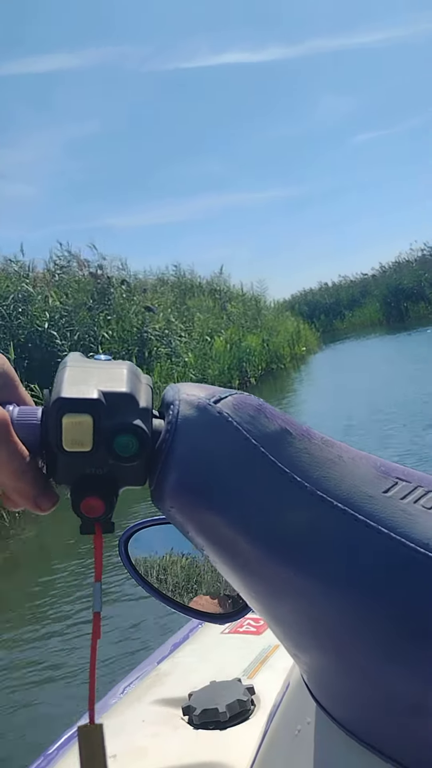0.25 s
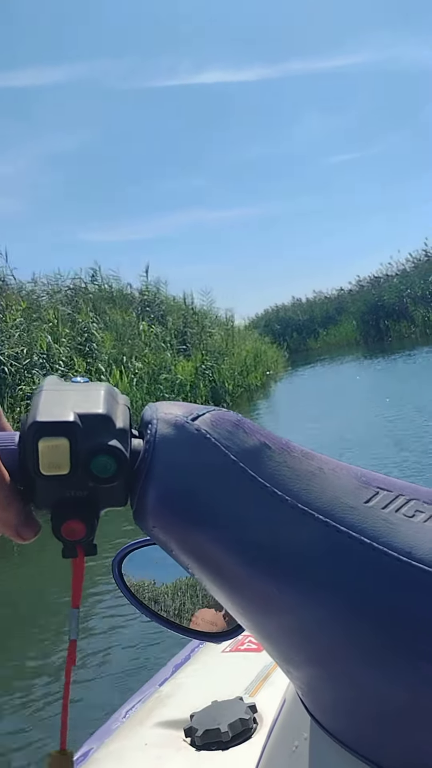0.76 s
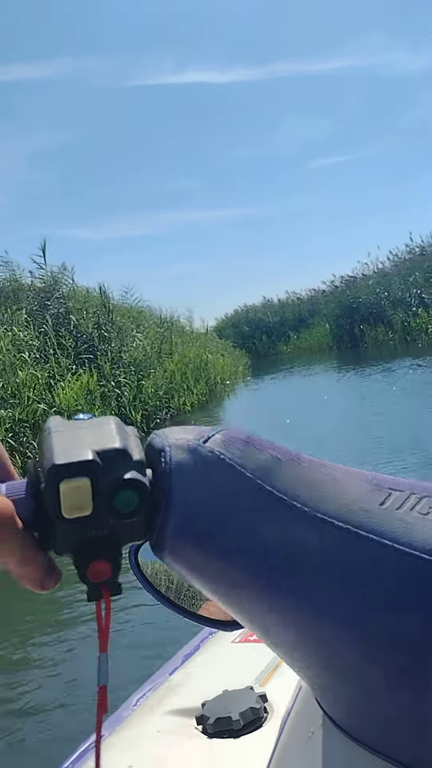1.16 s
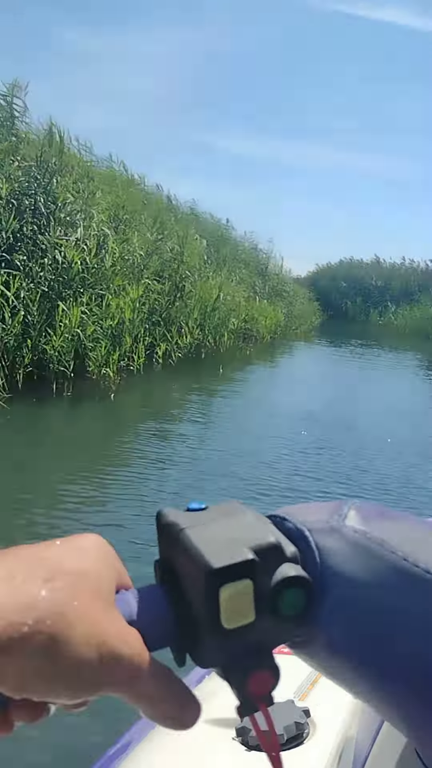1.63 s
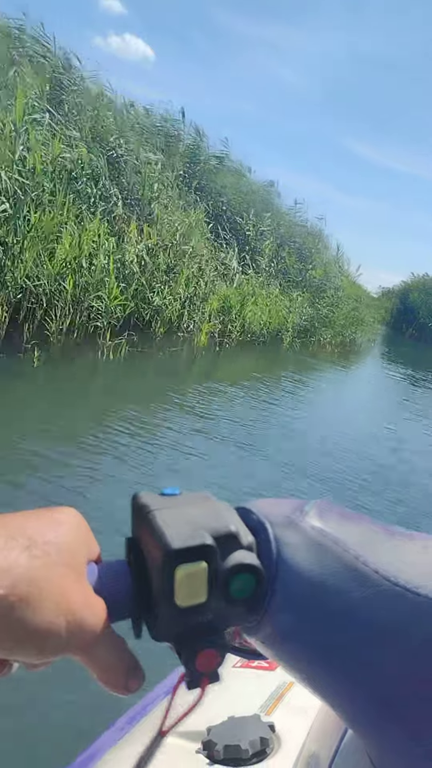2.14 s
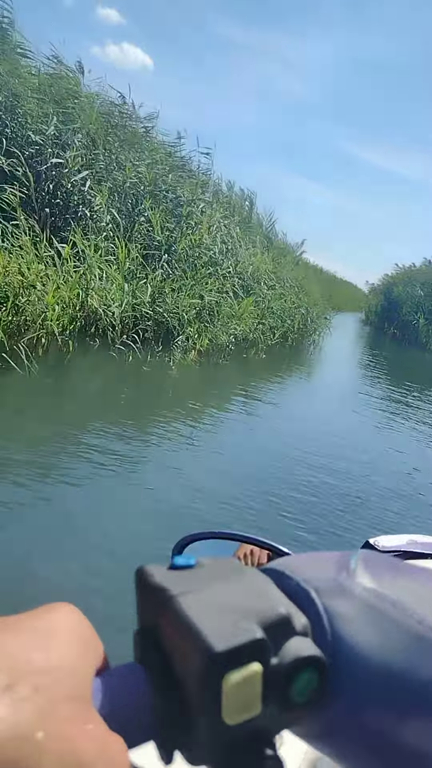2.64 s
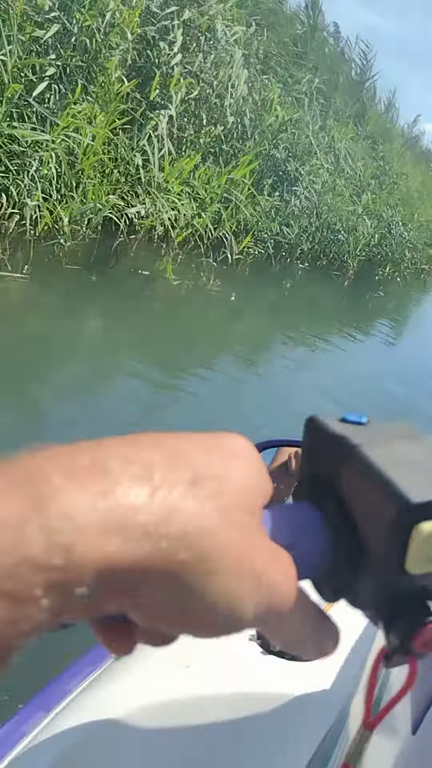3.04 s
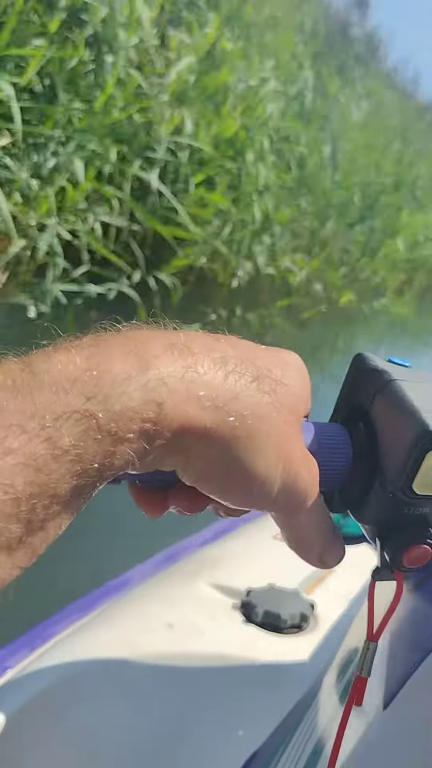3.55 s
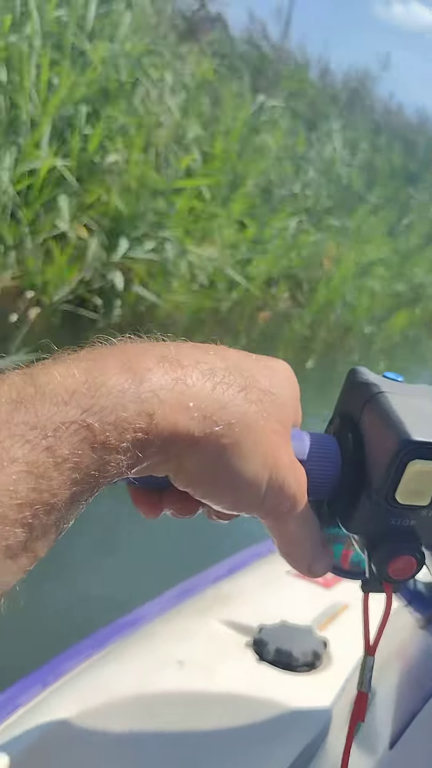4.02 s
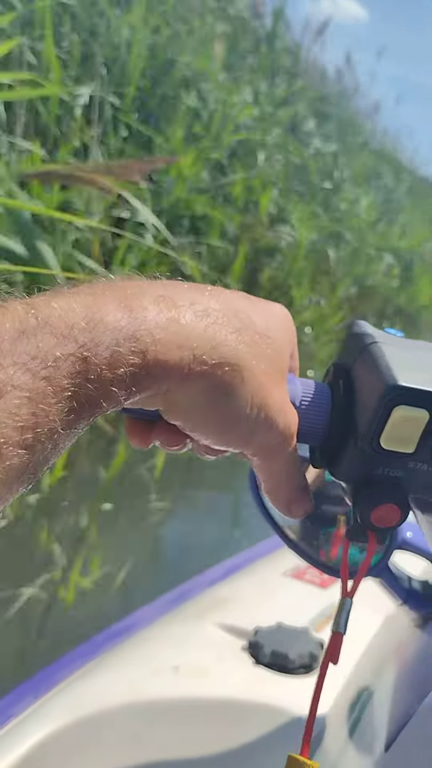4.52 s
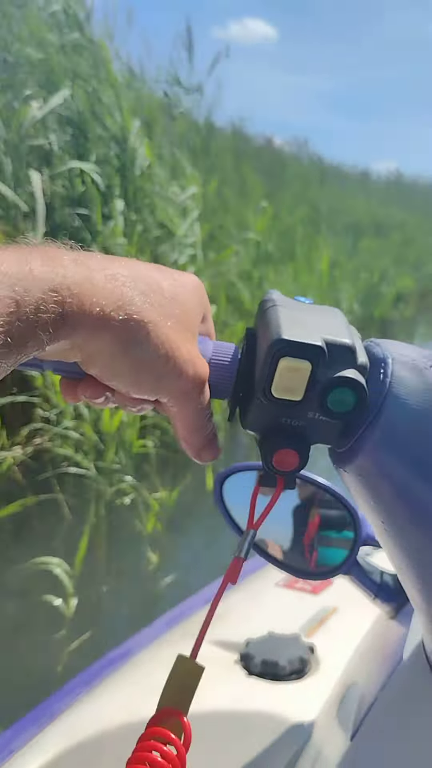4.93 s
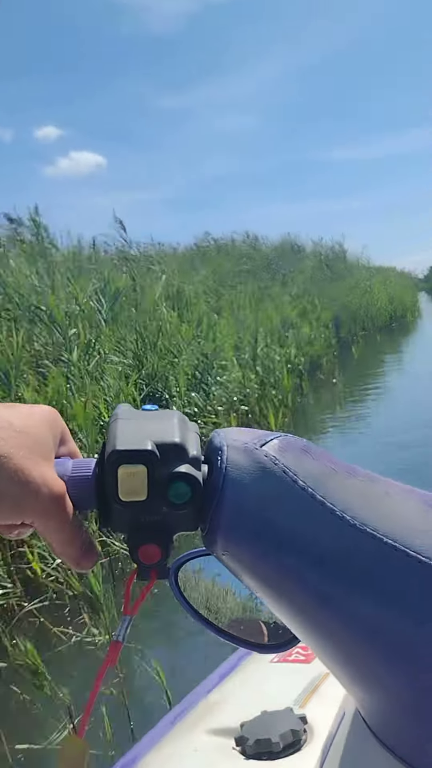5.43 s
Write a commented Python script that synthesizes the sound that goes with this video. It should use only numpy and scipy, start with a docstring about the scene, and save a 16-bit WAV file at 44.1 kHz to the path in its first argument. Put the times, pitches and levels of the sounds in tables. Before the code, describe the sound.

Outdoors on a marsh channel, the microphone rides by the handlebar of a personal watercraft. Its motor putters low, then climbs to a buzzing whine and winds down, with brief hoots from the hull. Two more bursts of throttle follow, the last bringing a stronger drone. Exhaust bubbles in the water throughout, while splashing and sizzling spray build in the second half, joined late by light, sharp ticks.

```python
"""A small watercraft in a reed channel

Heard from the handlebar, a two-stroke engine revs up three times. Its orders (tones at multiples of
the crank's turning rate) slide through the resonances of the pipe and hull, and the motor buzzes and
rasps under its cover. Exhaust gas burbles and gulps at the waterline, and a hull panel hoots. As the
craft gathers way the wash hisses louder, spray patters and sizzles, and a loose fitting ticks."""
import sys
import numpy as np
from scipy import signal
from scipy.fft import rfft, irfft
from scipy.io import wavfile
from scipy.ndimage import uniform_filter1d, minimum_filter1d

SR = 44100
rng = np.random.default_rng(int(sys.argv[2]) if len(sys.argv) > 2 else 0)


def store_wav(level_fs):
    """Save 16-bit WAV to argv[1]."""
    pcm = np.round(np.clip(np.atleast_2d(level_fs), -1, 1) * 32767)
    wavfile.write(sys.argv[1], SR, pcm.T.astype(np.int16))


N = 250488
TIME = np.arange(N) / SR
BINS = np.maximum(np.fft.rfftfreq(N, 1 / SR), 1)  # the frequencies of a spectrum, in Hz
IDLE_TURNS_PER_S, CRUISE_TURNS_PER_S = 64, 90

# The tuned pipe favours different orders at different speeds:
# (order [multiple of the crank rate], level at low revs [dB], at middle revs [dB], at high revs [dB])
ORDERS = [(4, -40, -43.5, -56), (5, -44, -49.5, -43), (6, -45, -48.5, -42), (7, -44.5, -43.5, -56.5),
          (8, -52, -57, -38.5), (9, -56.5, -57.5, -47.5), (10, -45.5, -47.5, -40.5), (11, -48.5, -49, -44),
          (12, -57.5, -48, -49), (13, -52, -54, -52), (14, -51, -45.5, -57.5), (15, -71, -58, -60),
          (16, -50, -56, -46), (17, -52, -47.5, -50.5), (20, -63.5, -51, -49.5), (21, -58.5, -54.5, -53),
          (22, -79.5, -51, -50)]


def from_db(db):
    """Turn decibels into a factor to multiply by."""
    return 10 ** (np.asarray(db) / 20)


def rms(x):
    """The average strength of a signal (root mean square)."""
    return np.sqrt(np.mean(x ** 2) + 1e-20)


def in_time(rows):
    """Join (time, value) points with straight lines, giving a value at every sample."""
    return np.interp(TIME, *np.transpose(rows))


def at_hz(points, hz):
    """Read between (frequency, value) points, with octaves evenly spaced."""
    known_hz, values = np.transpose(points)
    return np.interp(np.log(hz), np.log(known_hz), values)


def step(x):
    """A soft switch from 0 to 1 around x = 0."""
    return .5 + .5 * np.tanh(x)


def bumps(rows):
    """Bell-shaped lifts in dB from rows of (time, lift, half length)."""
    return sum(db * np.exp(-np.minimum(((TIME - s) / half) ** 2, 20)) for s, db, half in rows)


def swells(rows):
    """Bell-shaped rises out of silence from rows of (time, level, half length)."""
    return sum(from_db(db) * np.exp(-((TIME - s) / half) ** 2) for s, db, half in rows)


def drift(rate):
    """A smooth random wander of typical size 1, changing about `rate` times a second."""
    stride, warm_up = 40, 2000  # samples per point, points thrown away
    memory = np.exp(-2 * np.pi * rate * stride / SR)
    jitter = rng.standard_normal(N // stride + warm_up + 2)
    slow = signal.lfilter([1], [1, -2 * memory, memory * memory], jitter)[warm_up:]
    return np.interp(np.arange(N) / stride, np.arange(len(slow)), slow / rms(slow))


def stereo(hz):
    """Left and right gains, as complex numbers: each pitch is louder and earlier on one side."""
    # Which side is louder: (frequency [Hz], left minus right [dB])
    balance = [(30, 3.02), (70, 1.48), (130, -2), (210, -4), (290, -8), (340, -12), (430, -8), (530, -2),
               (650, 3.8), (880, 0.8), (1150, -11), (2200, -17), (4200, -12)]
    # Which side is earlier: (frequency [Hz], lead of the left [radians])
    left_lead = [(100, -0.8), (250, -0.86), (325, -0.87), (400, 0.46), (520, 1.94), (800, 1.77),
                 (1000, 0.3), (1300, -1.72)]
    ratio, lead = from_db(at_hz(balance, hz)), at_hz(left_lead, hz)
    return np.array([ratio * np.exp(.5j * lead), np.exp(-.5j * lead)]) * np.sqrt(2 / (1 + ratio ** 2))


def noise(colour_db, band_hz):
    """Stereo noise with a given spectrum; the average of its sides has strength 1 within the band."""
    # Low sounds are nearly the same on both sides: (frequency [Hz], likeness [0-1])
    likeness = [(300, .98), (600, .85), (1200, .45), (2500, .25), (8000, .2)]
    alike = at_hz(likeness, BINS)
    mid, side = rfft(rng.standard_normal((2, N)))
    pair = np.sqrt(1 + alike) * mid + np.sqrt(1 - alike) * side * [[1], [-1]]
    pair = pair * stereo(BINS) * from_db(colour_db)
    inside = (BINS > band_hz[0]) & (BINS < band_hz[1])
    return irfft(pair, N) / rms(irfft(pair.mean(axis=0) * inside, N))


def engine_speed():
    """Crank turns per second: after each move of the throttle the speed glides toward a new goal."""
    # Moves of the throttle: (time [s], goal [turns/s], lag [s])
    throttle = [(0.0, 65.7, 0.082), (0.42, 67.5, 0.06), (0.537, 71.1, 0.272), (0.938, 91.4, 0.378),
                (1.065, 122.7, 0.355), (1.219, 106.9, 0.073), (1.702, 88.1, 0.216), (1.846, 80.2, 0.47),
                (1.962, 82.2, 0.099), (2.166, 61.9, 0.739), (2.624, 88.2, 0.087), (2.732, 107.9, 0.066),
                (3.418, 96.6, 0.219), (3.767, 96.4, 0.061), (4.51, 92.1, 0.097), (4.839, 110.3, 0.071)]
    speed = np.full(N, float(IDLE_TURNS_PER_S))
    for s, goal, lag_s in throttle:
        start = int(s * SR)
        speed[start:] = goal + (speed[start] - goal) * np.exp(-TIME[:N - start] / lag_s)
    return speed


def acceleration(speed):
    """How many turns per second the engine gains each second."""
    return uniform_filter1d(np.gradient(speed) * SR, size=4000)


def coasting(speed):
    """How fast the engine is running down, from 0 to 1."""
    return np.tanh(np.maximum(-acceleration(speed), 0) / 13)


def doublings(speed):
    """How many times the speed has doubled from cruise; negative when slower."""
    return np.log2(speed / CRUISE_TURNS_PER_S)


def order_tone(order, speed, crank, gain):
    """One engine tone, sliding with the speed; higher orders leave the pipe later in the turn."""
    # An order flares or sags as the pipe comes in and out of tune with it:
    # (order [multiple of the crank rate], time [s], lift [dB], half length [s])
    flares = [(7, 0.55, -14, 0.055), (5, 1.097, 5, 0.03), (5, 1.21, 13, 0.03), (4, 1.276, 4, .04),
              (12, 1.38, 5.5, .1), (11, 1.55, 8.5, .14), (4, 1.3, 9, 0.058), (20, 1.68, 7.5, .05),
              (4, 1.82, 1.5, 0.076), (6, 2.7, 7, .06), (13, 2.76, 17, 0.061), (11, 2.36, 6, .09),
              (4, 2.8, 8, 0.068), (5, 2.88, 3.5, .08), (20, 3.38, 6, .1), (14, 3.5, 5.5, 0.087),
              (15, 4.66, 9.5, .1)]
    flare_db = bumps([row[1:] for row in flares if round(row[0]) == order])
    pipe_lag = .3 * order ** 2  # radians
    tone = np.sqrt(2) * gain * from_db(flare_db) * np.exp(1j * (order * crank - pipe_lag))
    grid_hz = np.arange(1, SR // 8)
    sides = np.array([np.interp(order * speed, grid_hz, side) for side in stereo(grid_hz)])
    return np.real(sides * tone)


def exhaust_note(speed, crank, gas_db):
    """The second and third orders drone; the unsteady first thuds with the escaping gas."""
    # Drone of the second order: (time [s], level [dB])
    second_order = [(0, -39.5), (1.0, -29.5), (1.22, -30), (1.35, -22.5), (1.68, -22.5), (1.82, -32.5),
                    (2.6, -39.5), (3.0, -29), (3.6, -31), (4.0, -26), (4.86, -28), (5.0, -20.5),
                    (5.68, -18.5)]
    # How the pipe favours the third order: (speed [turns/s], level [dB])
    pipe_tuning = [(65.2, -17), (70.8, -30.5), (71.8, -29), (83.3, -16.5), (89.6, -13), (104.6, -13.5),
                   (106.2, -13.5), (110.2, -19)]
    earlier_speed = np.interp(TIME - .033, TIME, speed)  # the drone takes a moment to follow
    pulling = np.tanh((np.maximum(acceleration(speed), 0) / 130) ** 2)  # nears 1 when revving up hard
    third_db = np.interp(earlier_speed, *np.transpose(pipe_tuning)) - .5 * pulling
    out = order_tone(.99, speed, crank, from_db(gas_db - 5.5 + drift(15)))
    for order, level_db in [(2, in_time(second_order)), (3, third_db)]:
        out += order_tone(order, speed, crank, from_db(level_db + drift(34)))
    return out


def hull(hz):
    """How the pipe and hull shape sound: each resonance lifts its band and rings on after a pulse."""
    # Resonances and the notches between them: (frequency [Hz], width [Hz], lift [dB])
    resonances = [(281.9, 16, 14.5), (396.6, 93, 16.5), (452.4, 39, 7), (529.2, 110, 16.5),
                  (656.4, 7.9, -12), (722, 63, 16.5), (789, 43, -4.5), (915.5, 34, 11), (1052, 65, -13.5),
                  (1250, 17, 5), (1434, 250, 12), (1470, 17, 5), (2155, 56, 6), (2330, 31, 10)]
    response = 1
    for centre, width, lift_db in resonances:
        gain = from_db(lift_db)
        detune = 1j * (hz / centre - centre / hz) * centre / width * np.sqrt(gain)
        response = response * (gain + detune) / (1 + detune)
    return response


def whine_lifts(speed):
    """Extra dB for a few orders that whine while the speed changes at high revs."""
    # Whining orders: (order [multiple of the crank rate], lift as revs climb [dB], as they fall [dB])
    whines = [(9, 6, 0), (12, 8, 0), (14, 0, 6.5)]
    high = step((speed - 96) / 5)  # switches on around 96 turns/s
    climbing = np.tanh(np.maximum(acceleration(speed), 0) / 14)
    falling = coasting(speed)
    return {order: high * (up_db * climbing + down_db * falling) for order, up_db, down_db in whines}


def upper_orders(speed, crank):
    """The orders add up to one putt a turn, which rings in the hull; the higher ones flutter more."""
    # Engine speeds for the three levels in ORDERS: (low [turns/s], middle [turns/s], high [turns/s])
    revs = (68, 94, 108)
    flutter_db = .5 * (1 + .8 * coasting(speed))  # the engine misfires while coasting
    response, whine_db = hull(BINS), whine_lifts(speed)
    out = np.zeros((2, N))
    for multiple, *levels_db in ORDERS:
        order = round(multiple)
        level_db = np.interp(speed, revs, levels_db) - .5 + whine_db.get(order, 0)
        level_db += flutter_db * np.sqrt(order) * drift(26)
        ringing = np.interp(order * speed, BINS, response)
        out += order_tone(order, speed, crank, from_db(level_db) * ringing)
    return out


def buzz(speed, crank):
    """The same fine clatter comes round every turn, making a buzz that grows with the revs."""
    # Spectrum of the buzz: (frequency [Hz], relative level [dB])
    colour = [(1500, -8), (2400, 5.5), (3000, -1.5), (3600, -18), (4600, -8.5), (5300, -8.5), (6400, -28),
              (8500, -36.5)]
    orders = np.setdiff1d(np.arange(18, 81), [round(row[0]) for row in ORDERS])
    turn = np.linspace(0, 2 * np.pi, 4096, endpoint=False)
    phases = rng.uniform(0, 2 * np.pi, len(orders))
    one_turn = np.cos(np.outer(turn, orders) + phases).sum(axis=1)
    clatter = np.interp(crank, turn, one_turn, period=2 * np.pi)
    pair = irfft(rfft(clatter) * from_db(at_hz(colour, BINS)) * stereo(BINS), N)
    return pair / rms(pair) * from_db(-49.5 + 19.5 * doublings(speed))


def fizz(speed):
    """A thin airy hiss lies above the rasp of the motor."""
    # Spectrum of the fizz: (frequency [Hz], relative level [dB])
    colour = [(4000, -14.5), (6600, -6.5), (7600, 5), (8700, -7.5), (10300, 1.5), (12000, -8),
              (13800, -4.5), (15000, -8)]
    air = noise(at_hz(colour, BINS), band_hz=(6500, 11500))
    return air * from_db(-77 + doublings(speed))


def rasp(speed, crank, calm):
    """Intake and piston noise rings in the hull and pulses once a turn and at each of two firings."""
    # Spectrum of the rasp before the hull shapes it: (frequency [Hz], relative level [dB])
    colour = [(50, -15.5), (130, 6.5), (450, 3.5), (620, -3), (1000, 0), (1350, -1.5), (1600, -7.5),
              (1820, -11.5), (2120, 2), (2400, -10.5), (2680, -12), (2890, -11.5), (3550, -31),
              (3770, -28.5), (4700, -32), (5300, -25), (6400, -37.5), (9000, -56)]
    hull_db = 20 * np.log10(np.abs(hull(BINS)))
    grit = noise(at_hz(colour, BINS) + .3 * hull_db, band_hz=(1900, 2400))
    pulsing = 1 + .066 * (np.cos(crank) + np.cos(2 * crank))
    # Louder with the revs, softer until the craft gathers way, more rattly while running down.
    level_db = -42.5 + 9.5 * doublings(speed) - 1.44 * calm + 1.5 * coasting(speed)
    return grit * pulsing * from_db(level_db + .87 * drift(37))


def burble(gas_db, calm):
    """Exhaust gas escapes under the stern in surging lumps, which are weaker in calm water."""
    # Larger gulps break the surface: (time [s], lift [dB], half length [s])
    gulps = [(.21, 7.5, 0.033), (2.32, 0.5, 0.034), (2.47, 5, 0.03), (2.59, 3.5, .035), (3.54, 7.5, 0.027),
             (5.41, 7, .05), (5.6, 0, .03)]
    # Spectrum of the bubbling: (frequency [Hz], relative level [dB])
    colour = [(12, -39.5), (25, -16.5), (45, -3), (65, 6), (88, 3.5), (115, -5), (160, -12.5), (260, -19),
              (800, -31.5), (1500, -67.5)]
    surge_db = drift(2.7)
    level_db = gas_db - 2 + bumps(gulps) - 4.5 * calm + surge_db
    lumps = noise(at_hz(colour, BINS), band_hz=(25, 135))
    size = np.sqrt(uniform_filter1d(lumps.mean(axis=0) ** 2, size=2600) + 1e-6)
    lumps = lumps / size ** .3  # partly evens out their sizes
    return lumps / rms(lumps.mean(axis=0)) * from_db(level_db)


def hoots():
    """A hull panel, stirred by a passing order, rings briefly at its own fixed pitch."""
    # Hoots of the panel: (time [s], level [dB], half length [s])
    hoot_swells = [(.89, -34, 0.13), (1.15, -25, 0.0087), (1.205, -28.5, 0.026), (2.76, -29, 0.02)]
    panel_hz = 918
    ring = stereo(np.array([panel_hz])) * np.exp(2j * np.pi * panel_hz * TIME)
    return np.sqrt(2) * swells(hoot_swells) * np.real(ring)


def wash(crank, wash_db):
    """Water thrown by the hull and the jet hisses in quick uneven splashes."""
    # Spectrum of the wash: (frequency [Hz], relative level [dB])
    colour = [(100, 31), (450, 7.5), (700, 18), (1200, 14), (1900, 9.5), (2400, 12), (2630, 8),
              (2870, 15.5), (3140, 13.5), (3480, 5), (3820, 6.5), (4800, -1.5), (5380, 0.5), (6400, -16),
              (7400, -15), (8700, -28), (10300, -20.5), (12200, -26), (13800, -24), (15000, -26)]
    hiss = noise(at_hz(colour, BINS), band_hz=(3500, 6500))
    throb = 1 + .055 * np.cos(2 * crank)
    splash_db = 1.28 * drift(24)
    return hiss * throb * from_db(wash_db - 2.5 + splash_db)


def drops(wash_db):
    """Drops of uneven size patter on the hull at random, louder as the wash grows."""
    drops_per_s, ring_hz, width_hz = 32, 3050, 420
    landed = rng.random(N) < drops_per_s / SR
    size_db = 3 * np.minimum(rng.exponential(1, N), 3)
    impacts = landed * from_db(size_db) * rng.choice([-1, 1], N)
    shell = 1 / (1 + 1j * (BINS / ring_hz - ring_hz / BINS) * ring_hz / (2 * width_hz)) ** 2
    patter = irfft(rfft(impacts) * shell * stereo(BINS), N)
    return patter / rms(patter) * from_db(wash_db - 3.5)


def sizzles():
    """Fine spray lands in short bright bursts."""
    # Bursts of spray: (time [s], level [dB], half length [s])
    bursts = [(2.307, -50, 0.0093), (2.343, -49, 0.019), (2.933, -55.5, 0.023), (3.398, -49, 0.019),
              (3.95, -48, 0.039), (4.137, -51, .028), (4.37, -51.5, 0.087), (5.08, -48.5, 0.11),
              (5.265, -43, 0.018)]
    # Spectrum of the spray: (frequency [Hz], relative level [dB])
    colour = [(3500, -24), (4800, -3), (5300, 5.5), (5650, -1), (6300, -26), (9000, -47)]
    return swells(bursts) * noise(at_hz(colour, BINS), band_hz=(5000, 5800))


def ticks(left_db, contact_s):
    """Light knocks on a loose handlebar fitting die away at once, giving dry ticks."""
    # Knocks: (time [s], peak level on the right [dB])
    knocks = [(4.431, -21), (4.669, -18), (4.907, -15.5), (5.034, -17), (5.4272, -6.8)]
    # Tones of the fitting: (frequency [Hz], relative level [dB], time to fade by 60 dB [s])
    tones = [(2860, 0, .0055), (2950, -27, .04)]
    out = np.zeros(N)
    for s, peak_db in knocks:
        age = np.clip(TIME - s, 0, .5)
        rise = 1 - np.exp(-(age / contact_s) ** 2)
        knock = np.zeros(N)
        for hz, db, fade_s in tones:
            fade = from_db(-60 * age / fade_s)
            knock += from_db(db) * rise * fade * np.sin(2 * np.pi * hz * age)
        out += from_db(peak_db) * knock / np.abs(knock).max()
    return out * from_db([[left_db], [0]])


def squeeze(x, above_db, share):
    """Quick gain control takes away a share of any excess level, as in the biggest gulps."""
    power = uniform_filter1d((x ** 2).mean(axis=0), size=1100)
    level_db = 10 * np.log10(np.abs(power) + 1e-9)
    cut_db = share * np.maximum(level_db - above_db, 0)
    return x * from_db(-uniform_filter1d(cut_db, size=500))


def scene():
    """One crankshaft, never quite steady, drives the engine sounds; the water joins in."""
    # Exhaust gas breaking through the water: (time [s], level [dB])
    gas_levels = [(0, -24), (.5, -29.5), (1.0, -21), (1.15, -33), (1.85, -20.5), (2.3, -17), (2.62, -16),
                  (2.72, -19), (3.0, -19), (3.12, -15), (4.2, -16), (4.6, -27), (4.75, -20.5),
                  (5.68, -16.5)]
    # Water washing along the hull: (time [s], level [dB])
    wash_levels = [(0.06, -75), (1.13, -70), (1.5, -60.5), (1.95, -49.5), (2.35, -50), (2.42, -56.5),
                   (2.7, -56), (3.12, -54), (3.26, -47), (3.52, -47), (4.4, -43.5), (4.52, -45),
                   (5.0, -39.5), (5.4, -43.5), (5.64, -44.5)]
    gas_db, wash_db = in_time(gas_levels), in_time(wash_levels)
    calm = step((-63 - wash_db) / 11.5)  # nears 1 while the wash is quiet
    speed = engine_speed()
    crank = 2 * np.pi * np.cumsum(speed * (1 + .0015 * drift(25))) / SR  # angle in radians
    engine = exhaust_note(speed, crank, gas_db + calm)  # thuds gain up to 1 dB in calm water
    engine += upper_orders(speed, crank) + buzz(speed, crank) + fizz(speed) + rasp(speed, crank, calm)
    water = burble(gas_db, calm) + wash(crank, wash_db) + sizzles() + drops(wash_db)
    return engine + hoots() + water + ticks(left_db=-14, contact_s=.0011)


def record(dry):
    """Hold the loudest peaks down, fade both ends and cut the highest treble."""
    ceiling, fade_s, cutoff_hz = .83, .003, 15100
    squeezed = squeeze(dry, above_db=-12.5, share=.67)
    safe_gain = np.minimum(1, ceiling / (np.abs(squeezed).max(axis=0) + 1e-9))
    limiter = uniform_filter1d(minimum_filter1d(safe_gain, size=500), size=500)
    from_edge_s = np.minimum(TIME, TIME[-1] - TIME)
    fade = np.sin(np.pi / 2 * np.clip(from_edge_s / fade_s, 0, 1)) ** 2
    treble_cut = signal.ellip(10, .1, 80, cutoff_hz, fs=SR, output="sos")
    return signal.sosfilt(treble_cut, squeezed * limiter * fade)


dry = scene()
out = record(dry)
store_wav(out)
```